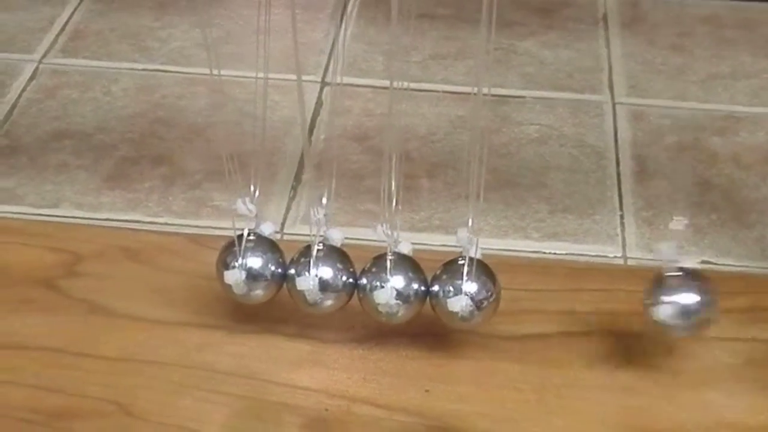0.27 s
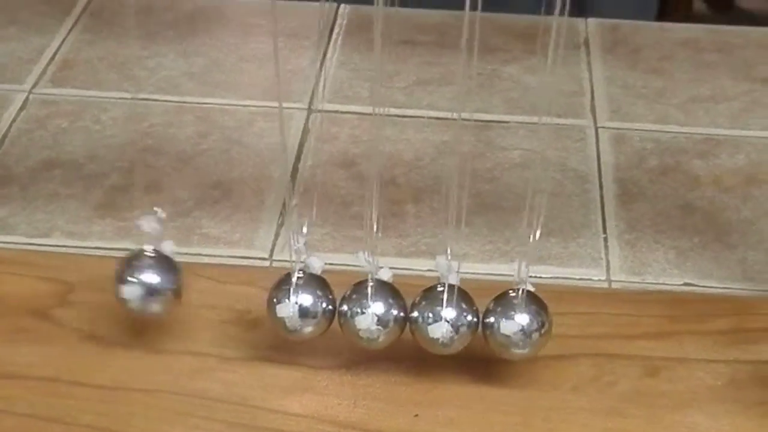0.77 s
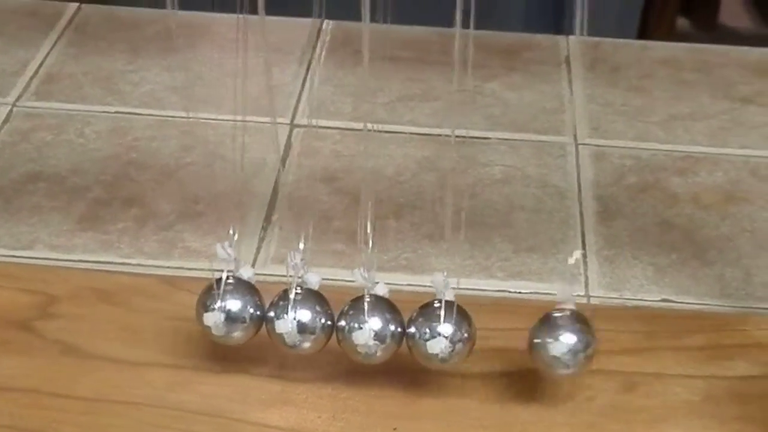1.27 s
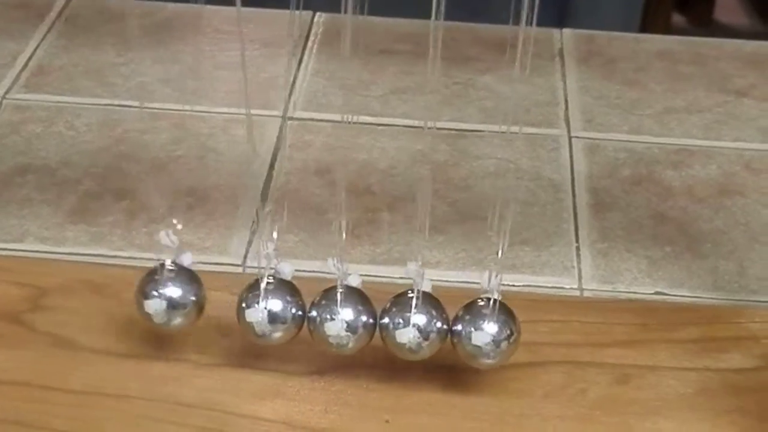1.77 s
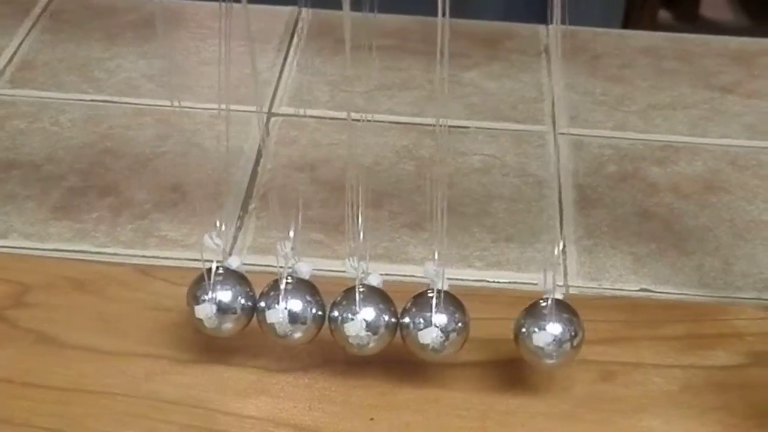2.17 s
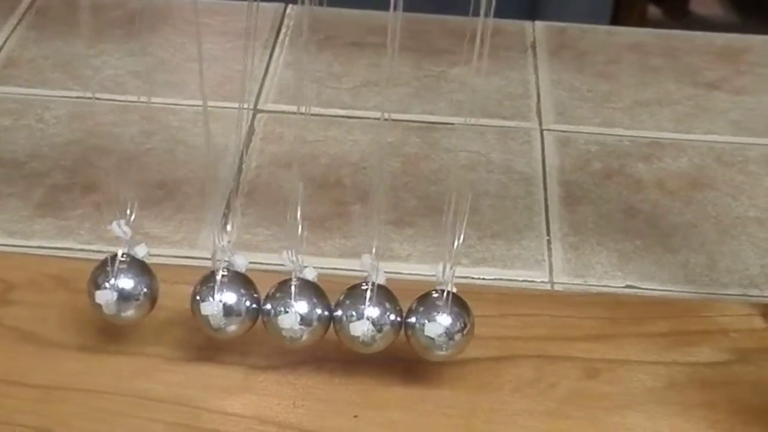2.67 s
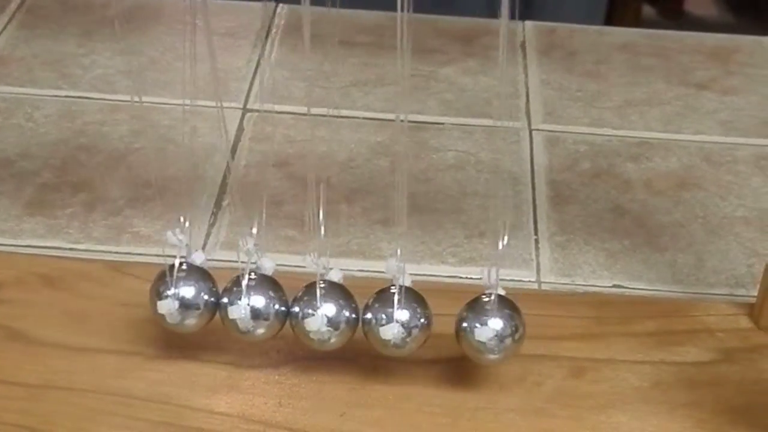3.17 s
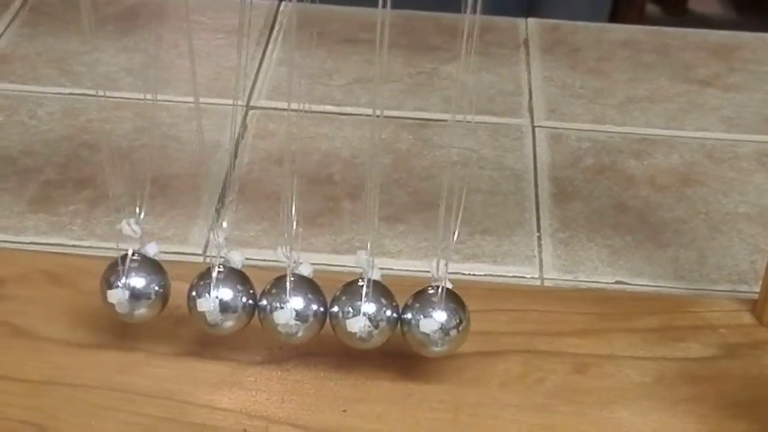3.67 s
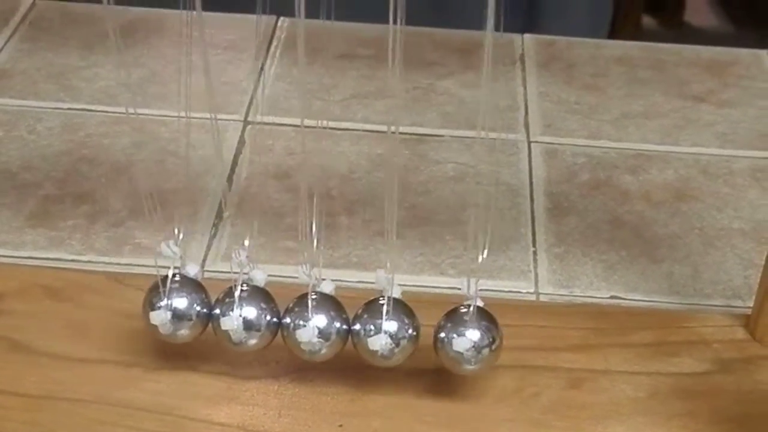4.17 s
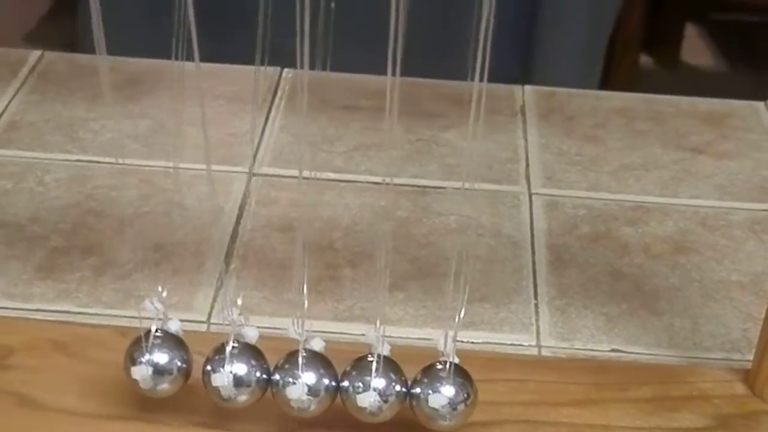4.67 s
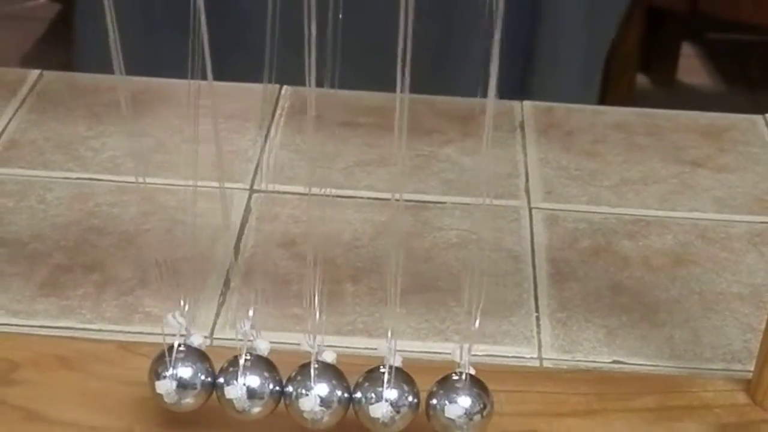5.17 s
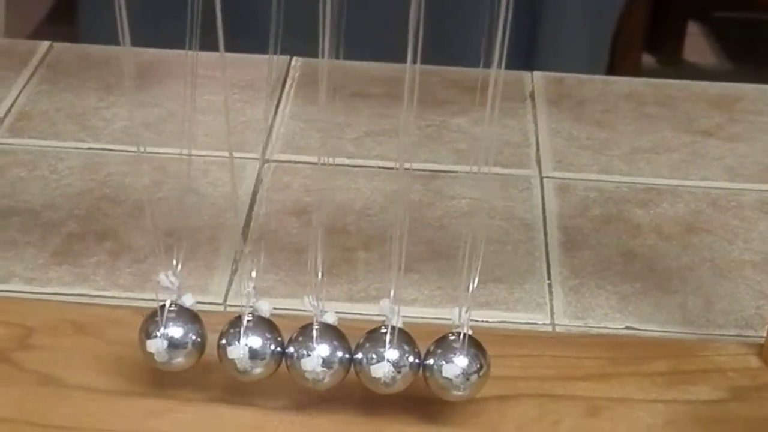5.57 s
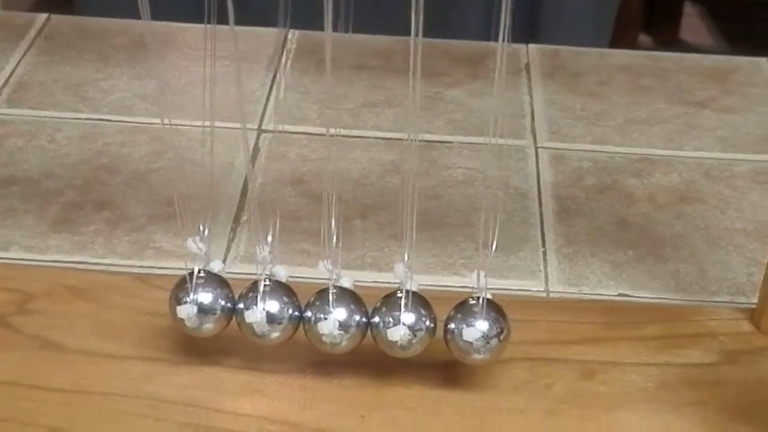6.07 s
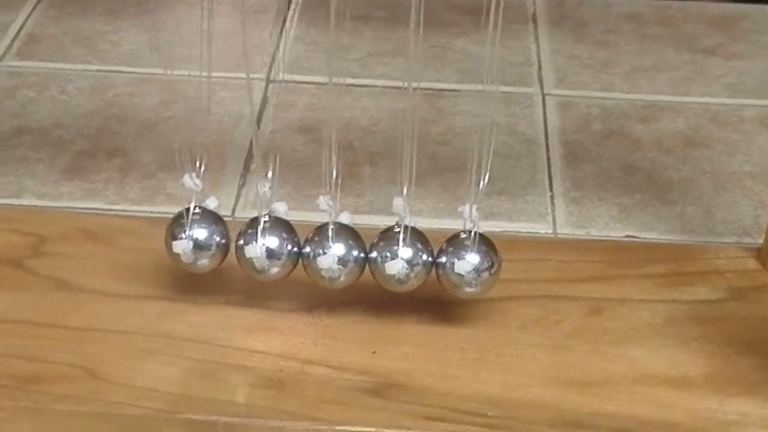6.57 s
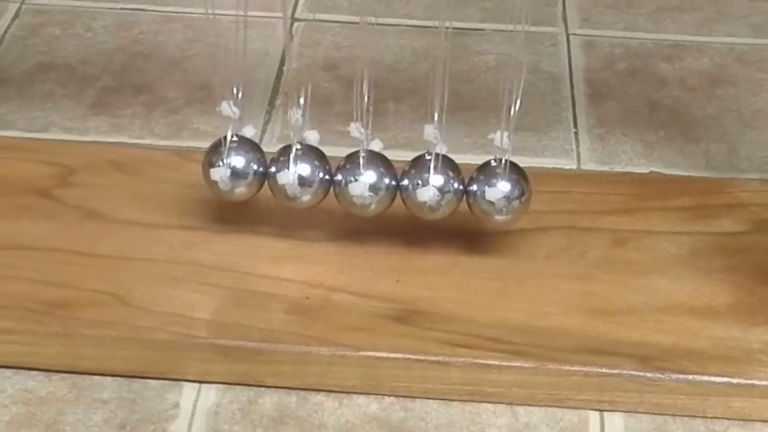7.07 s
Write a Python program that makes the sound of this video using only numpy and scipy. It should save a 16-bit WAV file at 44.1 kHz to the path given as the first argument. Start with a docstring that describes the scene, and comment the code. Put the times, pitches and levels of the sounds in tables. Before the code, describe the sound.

Steel pendulum balls clack together about twice a second, growing softer and duller, over a steady low appliance hum.

```python
"""An appliance hums in a live room, and the five steel balls of a pendulum cradle stir on a wooden table.
At 0.4 s the first and hardest clack runs through the row; the room answers and the camera's gain ducks.
Clacks follow twice a second, breaking into quick contacts where the balls hang slightly apart.
They grow softer and duller as the swing dies down, with faint nudges, frame taps and a rustle between.
From about 5 s a few thin rasps join the last weak clacks, over the steady hum and microphone hiss."""
import sys
import numpy as np
from scipy import signal
from scipy.fft import rfft, irfft, next_fast_len
from scipy.io import wavfile
from scipy.ndimage import uniform_filter1d, minimum_filter1d, map_coordinates

SR = 44100
rng = np.random.default_rng(int(sys.argv[2]) if len(sys.argv) > 2 else 0)


def to_wav(s):
    """Save 16-bit WAV."""
    ch = np.atleast_2d(s).T  # columns
    pcm = np.round(np.clip(ch, -1, 1) * 32767)  # PCM
    wavfile.write(sys.argv[1], SR, pcm.astype(np.int16))


N = 322812
TIME = np.arange(N) / SR
HIT_SIZE, LEAD_S = 32768, .002  # samples in one hit; pre-roll ahead of its attack
HIT_TIME, HIT_HZ = np.arange(HIT_SIZE) / SR, np.fft.rfftfreq(HIT_SIZE, 1 / SR)
TOP_HZ = 16650

# One clack a swing; a slower ball makes a longer, duller contact. Each row: treble corner in Hz,
# room send in dB, and the contacts, each with its start in seconds and relative level in dB.
CLACKS = [(14940, 6.3, [(.3742, -9)]), (14400, 6.8, [(.8735, -23), (.8753, -19), (.8766, -19),
          (.8798, -20)]), (13000, 6.8, [(1.3677, -17), (1.3691, -25)]), (12000, 8.1, [(1.8657, -28),
          (1.8737, -33), (1.8752, -29)]), (11200, 8.3, [(2.3527, -28), (2.3559, -35.5), (2.3613, -41)]),
          (11700, 6.6, [(2.8522, -33.5), (2.8563, -33.5), (2.8584, -36), (2.8630, -35)]),
          (9600, 8.3, [(3.3230, -34), (3.3341, -41.5), (3.3377, -41)]), (9700, 6.3, [(3.8324, -36.5),
          (3.8337, -34)]), (8500, 8, [(4.2937, -33.5), (4.2983, -48)]), (9300, 4.7, [(4.7959, -33)]),
          (8040, 7.2, [(5.2452, -38.5), (5.2541, -50)]), (8100, 8.7, [(5.7481, -43), (5.7496, -45)]),
          (7200, 5.2, [(6.1686, -61), (6.1821, -41.5)]), (7450, 8.9, [(6.6804, -53.5), (6.6886, -44.5),
          (6.6956, -47)]), (7400, 9.3, [(7.1060, -49.5), (7.1131, -59)])]
# The tone of one jerked ball. Each row: frequency in Hz, gain in dB.
BALL_EQ = [(500, -17.5), (1100, -13), (1900, -8.5), (3300, 0), (4600, -0.5), (7200, 1.5), (9000, 3.5),
           (11500, -1), (16000, -7)]
# Faint high steady tones that ring on after each clack.
# Each row: pitch in Hz, relative level in dB, t60 in seconds.
RING_MODES = [(3089, -50, .35), (4980, -47, .35), (5926, -45, .35), (6525, -38, .4), (7035, -38, .35),
              (7368, -39, .3), (8041, -44, .3), (8986, -45, .3)]
# The clearest nudges among the resting balls. Each row: start in seconds, relative level in dB.
BALL_NUDGES = [(.041, -62), (.173, -57), (.241, -58), (.7965, -51), (1.1745, -55), (1.242, -58),
               (1.287, -53.5), (1.3175, -47.5), (1.573, -52), (1.732, -56.5), (1.774, -56.5), (5.0765, -53),
               (5.2125, -52), (6.146, -58), (6.28, -57), (6.480, -59.5), (6.880, -57.5), (7.280, -63)]
# Dull frame taps, some in a stutter. Each row: start in seconds, peak in dB, tilt in dB per octave.
FRAME_TAPS = [(0.2459, -49, -1), (0.2504, -49.5, 0), (.2535, -52, -2), (0.2579, -58, 0), (1.044, -51, -6),
              (1.1745, -53, -8), (1.242, -53.5, -12), (1.256, -57, -8), (6.149, -53, -12),
              (6.280, -50.5, -11), (6.352, -47.5, 1), (6.3557, -50, -2), (6.3600, -51, -1),
              (6.480, -59, -2.5)]
# What a tap rings with. Each row: pitch in Hz, relative level in dB, t60 in seconds.
TAP_MODES = [(1110, -4, .012), (1440, -2, 0.018), (1840, -2, 0.018), (2480, -2.5, 0.015),
             (3810, -2.5, .012), (4120, -2.5, .012), (4750, -9, .009), (7000, -16.5, .008)]
# Slaps off nearby surfaces. Each row: delay in seconds, gain in dB.
EARLY_ECHOES = [(.0074, -19), (.0083, -18.5), (.0094, -16.5), (0.011, -21), (0.0162, -17.5)]
# The tone of a clack's reverb. Each row: frequency in Hz, gain in dB.
ROOM_EQ = [(500, -13.5), (1100, -9.5), (1800, -10), (2700, -5.5), (4000, -6.5), (5200, -2), (6500, 1),
           (7400, -1), (9000, -1.5), (11500, -17.5), (16000, -18.5)]
# How long the room rings. Each row: frequency in Hz, t60 in seconds.
ROOM_T60 = [(1500, 0.29), (4000, 0.34), (7000, 0.42), (10000, 0.27), (15000, 0.2)]
# Faint rasps. Each row: crest in seconds, half length in seconds, pitch in Hz, half width in Hz,
# rms level at the crest in dB.
RASP_SWELLS = [(5.124, 0.048, 1610, 80, -68), (5.65, 0.084, 7200, 1300, -78.5),
               (5.88, 0.18, 2300, 150, -71), (7.04, 0.11, 2320, 120, -72)]
# The rustle's fader ride. Each row: time in seconds, rms level in dB.
RUSTLE_FADER = [(0, -74.5), (.95, -85), (1.25, -68.5), (1.38, -81), (4.2, -81), (4.6, -72), (5.4, -72.5),
                (5.8, -77.5), (6.6, -73.5), (7.3, -75)]
# The rustle's narrow bands. Each row: centre in Hz, relative level in dB.
RUSTLE_PEAKS = [(1400, 1), (1700, -4), (2050, -5.5), (2500, -2.5)]
# Motor and mains tones. Each row: pitch in Hz, rms level in dB.
HUM_TONES = [(59.6, -61.5), (78, -60), (119.6, -60), (170.5, -42), (202.2, -48.5), (239.6, -53),
             (386, -61.5), (431, -62), (465, -66.5)]
# The tone of the moving air. Each row: frequency in Hz, relative level in dB.
AIR_EQ = [(20, -22.5), (35, -15.5), (60, -14), (100, -9), (170, 1.5), (230, -2.5), (270, -6.5), (315, -4.5),
          (400, -11), (540, -16), (1050, -30), (1450, -33.5), (2400, -42), (5000, -62.5)]
# The tone of the microphone hiss. Each row: frequency in Hz, relative level in dB.
HISS_EQ = [(1000, 5), (4000, -4.5), (7000, -4), (9000, -25), (12500, -29), (14200, 3), (15600, 2),
           (16300, -32.5)]


def cradle(fresh_room=.45, nudge_hz=7000, nudge_room_db=5):
    """Steel on steel: each swing's quick contacts, and the slight nudges in between."""
    same_room = room_tail()
    track = np.zeros(N)
    for corner_hz, room_db, contacts in CLACKS:
        # a swing's contacts interfere in frame and room, giving each clack its own metallic colour
        scatter = frame_scatter()
        swing_room = (same_room + room_tail()) / np.sqrt(2)
        for s, db in contacts:
            # each contact is at another place in the row, so a little of the room's answer is new
            room = amp(room_db) * (swing_room + fresh_room * room_tail()) / np.hypot(1, fresh_room)
            add(track, s - LEAD_S, contact(db, room + scatter, corner_hz))
    for s, db in [*BALL_NUDGES, *chance_nudges()]:
        room = amp(nudge_room_db) * same_room
        add(track, s - LEAD_S, contact(db, room + frame_scatter(), nudge_hz))
    return track


def contact(db, room, corner_hz, balls_per_s=7200, uneven_db=3, ring_db=-6, makeup_db=8.5, balls=5):
    """One blow jerks ball after ball; each radiates a pulse, and reverb and faint high tones ring on."""
    pulse = delay(LEAD_S) / (1 + (HIT_HZ / corner_hz) ** 11)
    step_s = (1 + .015 * rng.standard_normal()) / balls_per_s
    strengths = unit(amp(uneven_db * rng.standard_normal(balls)))
    row = sum(strength * delay(k * step_s) for k, strength in enumerate(strengths))
    click = pulse * amp(along(BALL_EQ, HIT_HZ)) * row
    reverb = pulse * amp(along(ROOM_EQ, HIT_HZ)) * room
    echoes = sum(amp(level) * delay(s + rng.normal(0, .00015)) for s, level in EARLY_ECHOES)
    ring = np.zeros(HIT_SIZE)
    for hz, level, t60 in RING_MODES:
        envelope = amp(ring_db + level + rng.normal(0, 1) - 60 * HIT_TIME / t60)
        ring += envelope * np.sin(2 * np.pi * hz * HIT_TIME)
    sound = irfft(click * (1 + echoes) + reverb + pulse * rfft(ring))
    return amp(db + makeup_db) * sound / np.linalg.norm(irfft(click))


def chance_nudges(every_s=.89, db=-62.5, spread_db=8):
    """The resting row stirs at random: start in seconds and relative level in dB of each nudge."""
    slots = np.arange(0, N / SR, every_s)
    when, strength = rng.random((len(slots), 2)).T
    return zip(slots + every_s * when, db + spread_db * (2 * strength - 1))


def frame_scatter(db=-5, t60=.012, after_s=.0006):
    """Spectrum of the few milliseconds in which the frame and table scatter a click."""
    burst = rng.standard_normal(HIT_SIZE) * amp(-60 * HIT_TIME / t60)
    return amp(db) * rfft(burst / np.linalg.norm(burst)) * delay(after_s)


def frame_taps(attack_s=.00038, pivot_hz=2500, room_db=-15):
    """Dull taps: each briefly rings the frame's low modes, and the room answers."""
    track, t = np.zeros(N), np.arange(SR // 16) / SR
    for s, db, tilt_db in FRAME_TAPS:
        ring = np.zeros(len(t))
        for hz, level, t60 in TAP_MODES:
            envelope = amp(level + tilt_db * np.log2(hz / pivot_hz) - 60 * t / t60)
            detuned_hz = hz * (1 + rng.normal(0, .012))
            ring += envelope * np.sin(2 * np.pi * detuned_hz * t)
        ring *= 1 - np.exp(-(t / attack_s) ** 2)
        add(track, s, amp(db) * ring / np.abs(ring).max())
    return track + amp(room_db) * signal.fftconvolve(track, irfft(room_tail()))[:N]


def room_tail(first_wall_s=.0044, build_s=.00085, patchy=.73, merge_s=.027):
    """Spectrum of a reverb of energy 1: separate reflections merge into a wash; the top dies first."""
    clumps = map_coordinates(rng.standard_normal(HIT_SIZE), [HIT_TIME * 1200])
    depth = patchy * np.exp(-HIT_TIME / merge_s) / 2
    reflections = rng.standard_normal(HIT_SIZE) * np.exp(depth * np.clip(clumps, -2, 2) - depth ** 2)
    hz, t, bands = signal.stft(reflections, SR, nperseg=256)
    decay = amp(-60 * t / along(ROOM_T60, hz)[:, None])
    tail = signal.istft(bands * decay, SR, nperseg=256)[1][:HIT_SIZE]
    tail *= 1 - np.exp(-np.maximum(HIT_TIME - first_wall_s, 0) / build_s)
    return rfft(tail / np.linalg.norm(tail))


def rasps(top_hz=9500):
    """Short swells of noise, each in one resonance: perhaps the strings rubbing."""
    track = np.zeros(N)
    for crest_s, half_s, centre_hz, width_hz, db in RASP_SWELLS:
        band = noise(lambda hz: resonance(hz, centre_hz, width_hz) / (1 + (hz / top_hz) ** 16))
        swell = np.exp(-((TIME - crest_s) / half_s) ** 2)
        track += amp(db) * swell * band
    return track


def rustle(relative_width=.1, flutter_db=4.5):
    """A light rustle whose narrow bands come and go on their own."""
    bands = np.zeros(N)
    for centre_hz, db in RUSTLE_PEAKS:
        flutter = amp(db + flutter_db * wobble(22))
        bands += flutter * noise(lambda hz: resonance(hz, centre_hz, relative_width * centre_hz))
    fader_db = np.interp(TIME, *np.transpose(RUSTLE_FADER))
    return amp(fader_db) * unit(bands)


def appliance(air_db=-42.5, drift_hz=.27, waver_db=.62, dip_db=1.0, air_top_hz=5500):
    """The bed: slightly unsteady motor and mains tones over the rush of moving air."""
    hum = np.zeros(N)
    for pitch_hz, db in HUM_TONES:
        cycles = np.cumsum(pitch_hz + drift_hz * wobble(2.094)) / SR + rng.random()
        hum += np.sqrt(2) * amp(db + waver_db * wobble(5)) * np.sin(2 * np.pi * cycles)
    air = noise(lambda hz: amp(along(AIR_EQ, hz)) / (1 + (hz / air_top_hz) ** 4))
    return hum + amp(air_db - dip_db * wobble(1.9)) * air


def hiss(db=-76):
    """The microphone's own thin hiss."""
    return amp(db) * noise(lambda hz: amp(along(HISS_EQ, hz)) * (hz < TOP_HZ))


def gain_control(x, ceiling_db=-22.0, hold_s=.14, release_db_per_s=24, smooth_samples=16):
    """A peak over the ceiling ducks the gain at once; after a hold it climbs back."""
    duck_db = np.minimum(ceiling_db - 20 * np.log10(np.abs(x) + 1e-9), 0)
    half_hold = int(hold_s * SR / 2)
    held_db = minimum_filter1d(duck_db, 2 * half_hold + 1, origin=half_hold, mode="nearest")
    climb_db = release_db_per_s * TIME
    gain = amp(np.minimum.accumulate(held_db - climb_db) + climb_db)
    return x * uniform_filter1d(minimum_filter1d(gain, smooth_samples), smooth_samples)


def amp(db):
    """Decibels to gain."""
    return 10 ** (np.asarray(db) / 20)


def unit(x):
    """Scale to rms 1."""
    return x / np.sqrt(np.mean(x ** 2) + 1e-20)


def along(points, hz):
    """A curve through the points on a log frequency axis."""
    knots_hz, values = np.transpose(points)
    return np.interp(np.log(hz + 1), np.log(knots_hz + 1), values)


def wobble(rate):
    """A smooth random curve, rate knots a second."""
    return map_coordinates(rng.standard_normal(int(N * rate / SR) + 4), [TIME * rate])


def resonance(hz, centre_hz, half_width_hz):
    """A bell-shaped response, 1 at its centre."""
    return 1 / (1 + ((hz - centre_hz) / half_width_hz) ** 2)


def filtered(x, response):
    """EQ x with a gain that is a function of frequency."""
    size = next_fast_len(len(x) + SR // 2)
    return irfft(rfft(x, size) * response(np.fft.rfftfreq(size, 1 / SR)), size)[:len(x)]


def noise(response):
    """Noise of rms 1, coloured by the response."""
    return unit(filtered(rng.standard_normal(N), response))


def delay(s):
    """The phase ramp of a delay of s seconds."""
    return np.exp(-2j * np.pi * HIT_HZ * s)


def add(track, s, sound):
    """Mix a sound into the track at s seconds."""
    part = track[max(round(s * SR), 0):][:len(sound)]
    part += sound[:len(part)]


def scene():
    """The cradle in the humming room, in mono."""
    return (cradle() + frame_taps() + rasps() + rustle() + appliance() + hiss())[None]


def record(dry):
    """The camera's gain control and band limit."""
    return filtered(gain_control(dry[0]), lambda hz: hz < TOP_HZ)[None]


dry = scene()
out = record(dry)
to_wav(out)
```